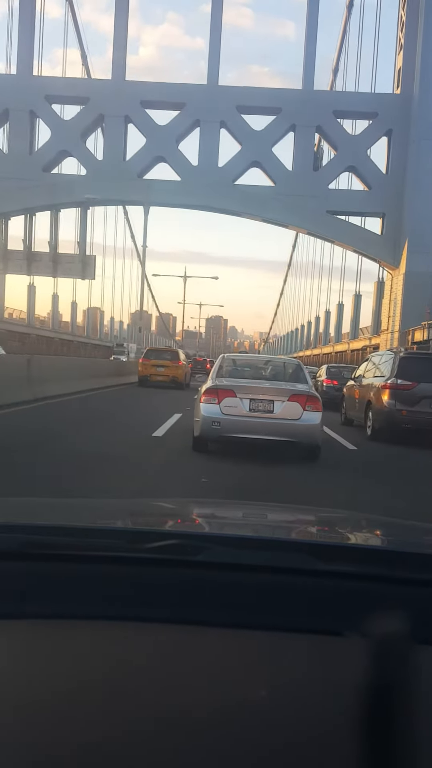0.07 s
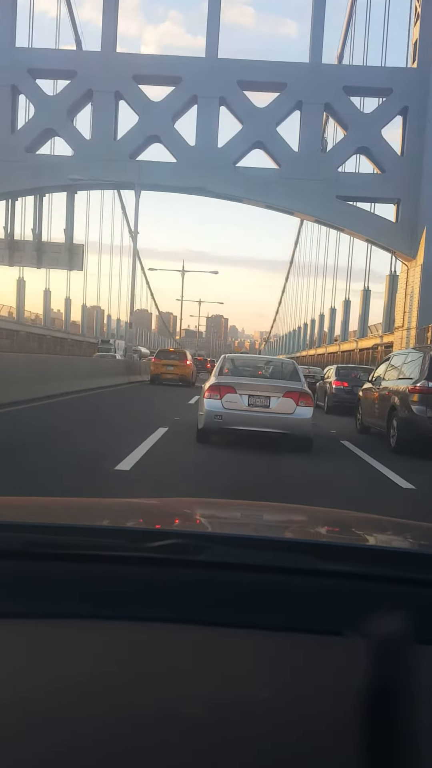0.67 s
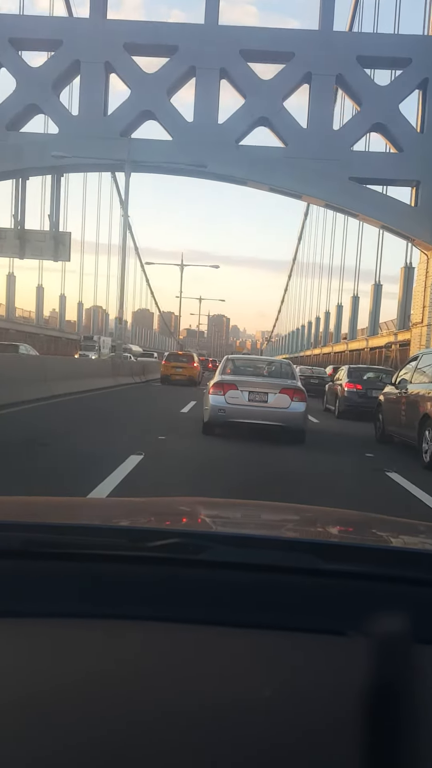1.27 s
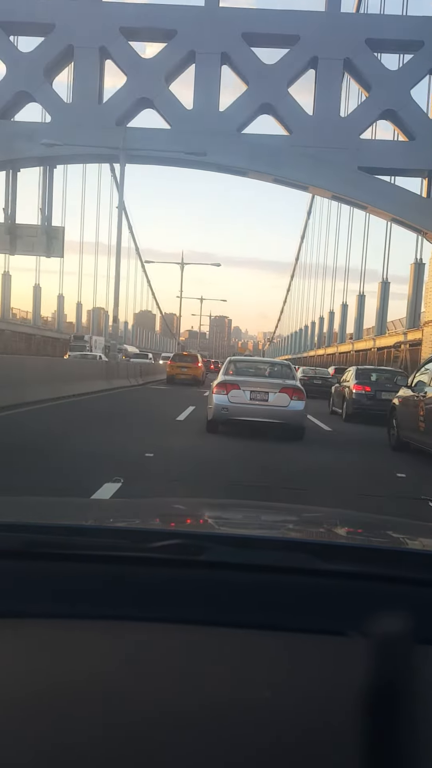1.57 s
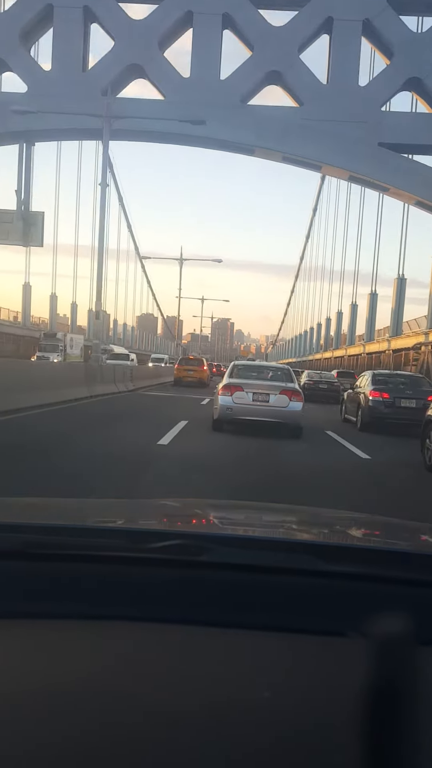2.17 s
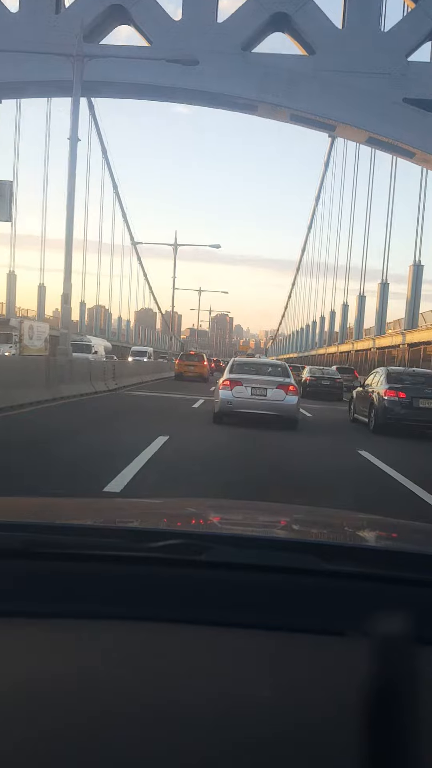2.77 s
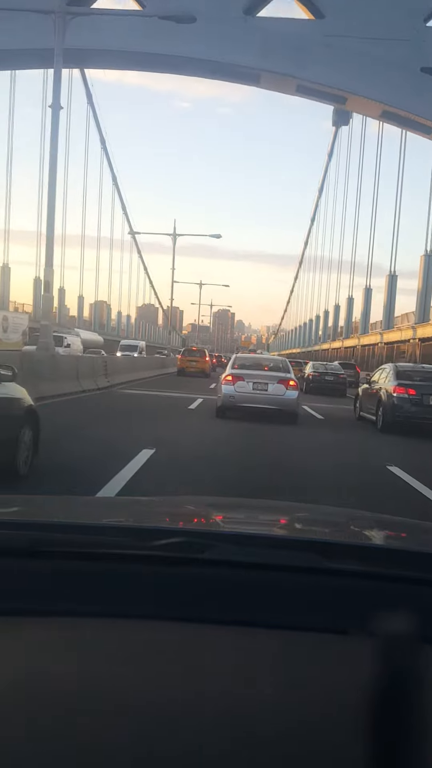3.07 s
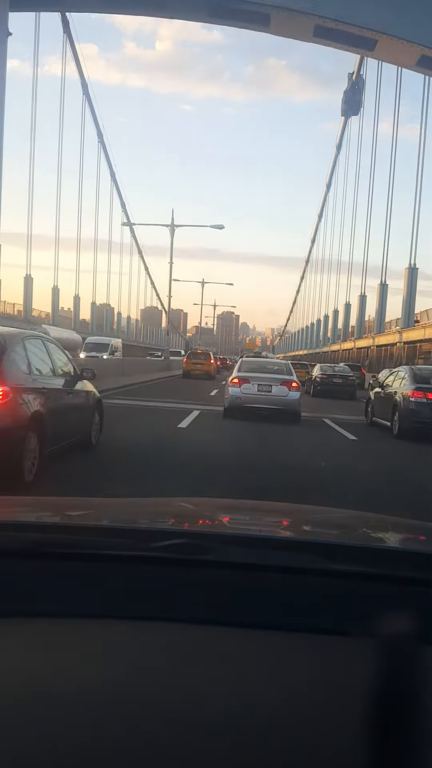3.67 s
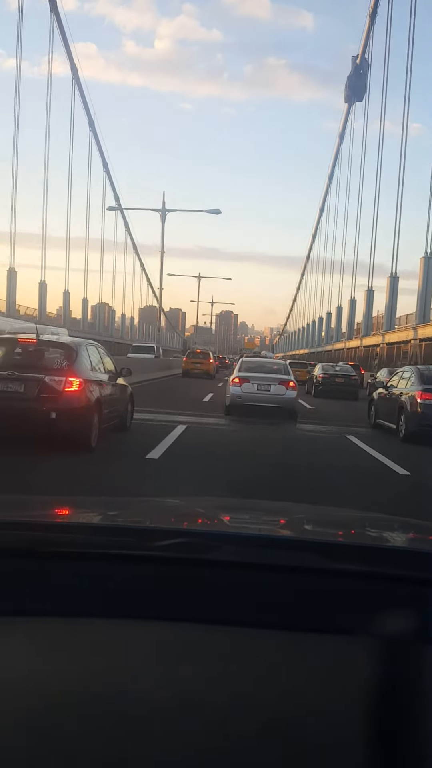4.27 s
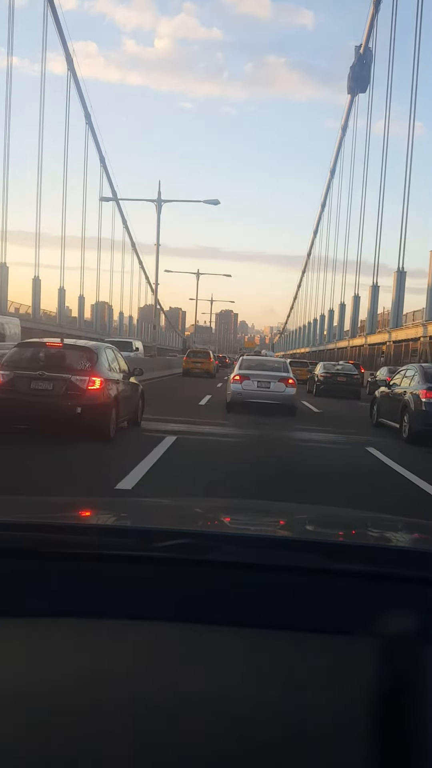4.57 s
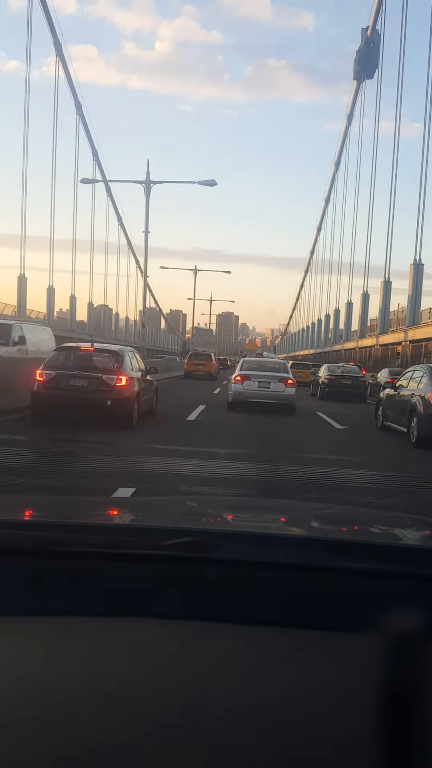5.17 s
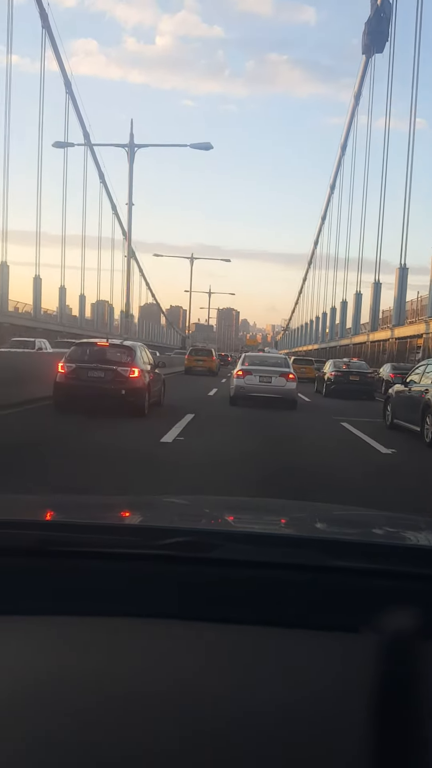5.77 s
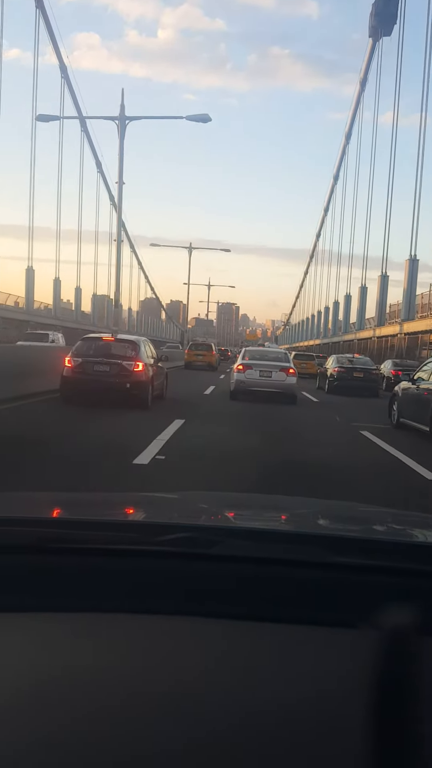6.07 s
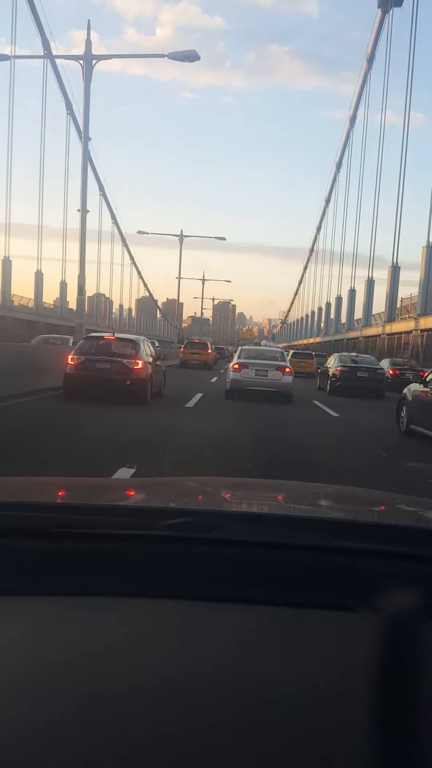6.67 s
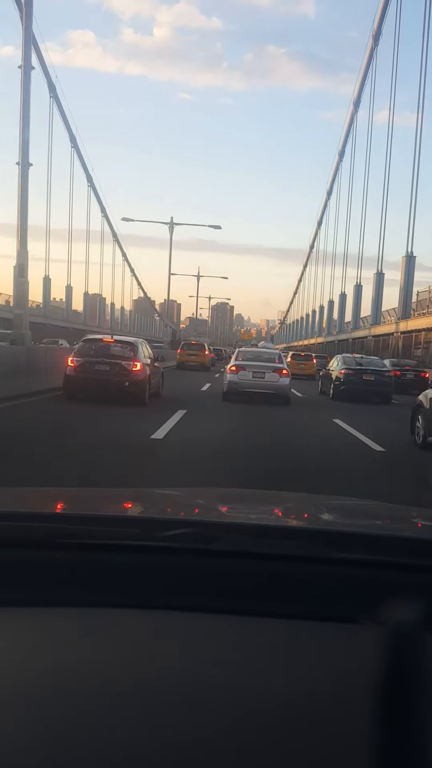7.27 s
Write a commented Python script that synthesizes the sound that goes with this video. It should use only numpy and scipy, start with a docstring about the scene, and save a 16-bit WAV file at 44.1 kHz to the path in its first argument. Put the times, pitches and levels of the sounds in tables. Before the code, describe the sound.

Low road rumble inside a moving car, with ticking plastic trim, one sharp clack and tyres thumping over a bridge joint.

```python
"""Road noise inside a car rolling over a suspension bridge in slow traffic.
The uneven deck drives the cabin's low resonances, the tyres roar, and nearby cars hiss and hum
through the glass. Front and rear wheels strike small seams, then rumble over a steel expansion joint.
Plastic trim ticks throughout, clacks once and creaks briefly by stick-slip friction.
Early on something soft brushes over the trim, and a tiny metal part chinks as it bounces."""
import sys
import numpy as np
from scipy import signal
from scipy.fft import rfft, irfft, next_fast_len
from scipy.io import wavfile
from scipy.ndimage import uniform_filter1d

SR = 44100
rng = np.random.default_rng(int(sys.argv[2]) if len(sys.argv) > 2 else 0)


def persist_wave(psi):
    """Save psi, clipped to +-1, as 16-bit WAV."""
    counts = np.round(np.clip(psi, -1, 1) * 32767).astype(np.int16)
    wavfile.write(sys.argv[1], SR, np.atleast_2d(counts).T)


N = 331191
TIME = np.arange(N) / SR


def gain_of(db):
    """Amplitude grows tenfold for every 20 dB."""
    return 10 ** (np.asarray(db) / 20)


def unit_rms(x):
    """Normalisation to a mean power of one."""
    return x / np.sqrt(np.mean(x ** 2) + 1e-20)


def at_hz(points, hz):
    """Interpolation on a logarithmic frequency axis."""
    f, value = np.transpose(points)
    return np.interp(np.log(hz + 1), np.log(f + 1), value)


def envelope(table, column):
    """Interpolation in decibels turns a column of levels into a gain for every sample."""
    rows = np.array(table)
    return gain_of(np.interp(TIME, rows[:, 0], rows[:, column]))


def add(mix, start_s, sound):
    """Superposition: a sound adds to the mix from its start time."""
    part = mix[:, round(start_s * SR):][:, :sound.shape[1]]
    part += sound[:, :part.shape[1]]


def noise():
    """Two uncorrelated white noises."""
    return rng.standard_normal((2, N))


def wander(fastest_hz):
    """Band-limited noise: a slow random motion of rms 1."""
    size = next_fast_len(N)
    hz = np.fft.rfftfreq(size, 1 / SR)
    spectrum = rfft(rng.standard_normal(size)) * (hz > 1) / (1 + (hz / fastest_hz) ** 4)
    return unit_rms(irfft(spectrum, size)[:N])


def ripple(hz, spacing_hz, depth_db):
    """Interference of reflections off glass and dashboard leaves fine peaks and dips above the bass."""
    heights = rng.standard_normal(2048)
    comb = np.interp(hz / spacing_hz, np.arange(len(heights)), heights)
    return depth_db * comb * np.clip(hz / 1200, 0, 1)


# Resonances of cabin air, tyre cavities and panels. Each row: frequency in Hz, width in Hz, lift in dB.
CABIN_MODES = [(115.4, 24, 5.5), (175.3, 24, 5.5), (201.8, 4.4, 6), (256, 19, 1.5), (643, 36, 5),
               (728, 50, 3), (970, 30, 0), (1096, 50, 4.5)]
# Likeness of left and right. Each row: frequency in Hz, correlation.
CORRELATION = [(40, 0.96), (200, 0.99), (280, 0.87), (470, 0.9), (570, 0.39), (660, 0.5), (880, 0.54),
               (1000, 0.36), (1100, 0.079), (1400, 0.17), (1750, -0.3), (2500, 0.57), (3400, -0.22),
               (5000, -0.013)]
# Stereo balance. Each row: frequency in Hz, left minus right in dB.
BALANCE = [(30, -4), (65, -0.5), (95, -1.5), (140, 0.5), (500, 0), (770, 2), (1200, 1), (3000, -1),
           (12000, -1)]


def in_cabin(drive, spectrum):
    """Forced response: noise excites the cabin's resonances, partly correlated between left and right."""
    size = next_fast_len(N)
    hz = np.fft.rfftfreq(size, 1 / SR)
    reflections = gain_of([ripple(hz, spacing_hz=45, depth_db=1.2) for _ in drive])
    common, apart = rfft(drive, size) * reflections
    correlation = at_hz(CORRELATION, hz)
    mid, side = common * np.sqrt(1 + correlation), apart * np.sqrt(1 - correlation)
    lean = gain_of(at_hz(BALANCE, hz) / 2)
    stereo = np.array([(mid + side) * lean, (mid - side) / lean])
    ring_db = sum(db / (1 + (2 * (hz - f) / width) ** 2) for f, width, db in CABIN_MODES)
    return unit_rms(irfft(stereo * gain_of(at_hz(spectrum, hz) + ring_db), size)[:, :N])


def steadied(x, span_s, share):
    """Sustained excitation: rolling keeps feeding a rumble, evening out a share of its slow swings."""
    span = int(span_s * SR)
    power = uniform_filter1d(uniform_filter1d((x ** 2).mean(0), span), span)
    return unit_rms(x / (np.abs(power) + 1e-9) ** (share / 2))


# Coarseness of the deck, greatest at the steel joint. Each row: time in seconds, coarseness in dB.
COARSENESS = [(0, 0), (.7, -1.5), (1.6, .5), (2.5, 1.5), (3.3, -1.5), (4.4, -1.5), (4.8, 3.5), (5.35, 4),
              (6.08, 6.5), (6.2, 8), (6.58, 9), (6.8, 4), (7.5, 4)]
# Humps, dips and seams. Each row: start in seconds, then peak shake, drum and roar, each in dB.
DECK_BUMPS = [(.13, -23, -27.5, -53), (1.02, -24, -50, -36), (1.36, -22.5, -33, -34.5),
              (2.57, -24, -29, -41), (2.77, -22.5, -27.5, -54), (3, -22, -26, -54),
              (4.14, -25.5, -43, -33.5), (4.54, -41, -28.5, -40), (5.26, -29, -27, -30),
              (5.65, -19.5, -33, -31.5), (5.99, -30, -20.5, -26), (6.135, -25, -24, -24.5),
              (6.48, -35, -20.5, -32), (6.7, -15, -24, -46), (6.869, -15, -37, -45),
              (7.19, -24, -26.5, -50)]


def deck_gain(asphalt_db, exponent, rise_s, bump_column):
    """Incoherent powers add: a power law of coarseness, plus a quick swell and slower fade per bump."""
    steady = gain_of(asphalt_db) * envelope(COARSENESS, column=1) ** exponent
    t = np.arange(SR) / SR
    swell = (t / rise_s * np.exp(1 - t / rise_s)) ** 0.6
    bump_power = np.zeros((1, N))
    for row in DECK_BUMPS:
        add(bump_power, row[0], (gain_of(row[bump_column]) * swell[None]) ** 2)
    return np.sqrt(steady ** 2 + bump_power)


# Spectra of body shake, panel drum and tread roar. Each row: frequency in Hz, relative density in dB.
SHAKE_SPECTRUM = [(12, -28.5), (24, -15), (33, -7.5), (41, 2), (53, 6.5), (64, -7), (76, 4.5), (92, -12.5),
                  (130, -31), (300, -90.5)]
DRUM_SPECTRUM = [(55, -48.5), (90, 0), (115, 1), (150, -4), (200, -8), (260, -10.5), (340, -19), (700, -67)]
ROAR_SPECTRUM = [(150, -2.5), (205, 3), (280, 3.5), (340, 2), (450, 1), (570, -2.5), (720, -11.5),
                 (900, -11), (1300, -32.5), (2500, -26.5), (6000, -63.5)]


def road():
    """Forced vibration: long road waves shake the body, shorter ones drum the panels, grit roars."""
    suspension_rise_s, tread_rise_s = 0.051, 0.02
    shake = steadied(in_cabin(noise(), SHAKE_SPECTRUM), span_s=.09, share=.85)
    shake *= deck_gain(asphalt_db=-25.5, exponent=0.72, rise_s=suspension_rise_s, bump_column=1)
    drum = steadied(in_cabin(noise(), DRUM_SPECTRUM), span_s=.06, share=.55)
    drum *= deck_gain(asphalt_db=-28, exponent=0.7, rise_s=suspension_rise_s, bump_column=2)
    grit = noise() * gain_of(0.56 * wander(fastest_hz=35))
    roar = steadied(in_cabin(grit, ROAR_SPECTRUM), span_s=.04, share=.4)
    roar *= deck_gain(asphalt_db=-37, exponent=1.2, rise_s=tread_rise_s, bump_column=3)
    return shake + drum + roar


# Tyres on worn surface. Each row: frequency in Hz, relative density in dB.
WORN_SPECTRUM = [(150, -28.5), (245, 8.5), (340, -7), (520, -6.5), (720, 1.5), (880, -1.5), (1100, -8.5),
                 (1600, -31), (4000, -63.5)]
# Worn deck before and after the joint. Each row: start in seconds, end in seconds, level in dB.
WORN_SPANS = [(5.144, 6.063, -33.5), (6.605, 7.8, -38)]


def worn_surface(fade_s=0.13):
    """Roughness excitation: a further roar fades in and out as the tyres cross each worn stretch."""
    roar = in_cabin(noise() * gain_of(1.4 * wander(fastest_hz=22)), WORN_SPECTRUM)
    return roar * sum(gain_of(db) * (np.tanh((TIME - start) / fade_s) - np.tanh((TIME - end) / fade_s))
                      for start, end, db in WORN_SPANS) / 2


# The surrounding cars. Each row: time in seconds, relative rush in dB, relative hiss in dB.
TRAFFIC_LEVELS = [(0, -43.5, -69.5), (1, -42, -74), (2.1, -43.5, -85), (3.5, -45.5, -73), (4.3, -45, -77),
                  (5.6, -41.5, -69), (6.1, -42, -70), (6.6, -41.5, -65), (7.5, -42.5, -69)]
# Spectra of their rush and hiss. Each row: frequency in Hz, relative density in dB.
RUSH_SPECTRUM = [(300, -2), (600, -7.5), (780, 1), (950, 0.5), (1020, -4.5), (1110, 0), (1350, -3.5),
                 (1650, -6), (2300, -13.5), (3200, -20), (3600, -23.5), (4700, -29), (8000, -39.5),
                 (16000, -52.5)]
HISS_SPECTRUM = [(1500, -13), (3000, 17), (4000, 13), (4700, 4), (6000, 1.5), (7800, 0), (8600, 2),
                 (10000, -1.5), (11000, -15), (13500, -11), (15800, -22)]


def traffic():
    """Airborne transmission: tyre rush comes through the glass, and a thin hiss leaks past the seals."""
    rush = in_cabin(noise(), RUSH_SPECTRUM) * envelope(TRAFFIC_LEVELS, column=1)
    rush *= gain_of(5 + 0.92 * wander(fastest_hz=25))
    hiss = in_cabin(noise(), HISS_SPECTRUM) * envelope(TRAFFIC_LEVELS, column=2)
    hiss *= gain_of(11.5 + 2.2 * wander(fastest_hz=24))
    return rush + hiss


# Hum of tread grooves. Each row: frequency in Hz, relative density in dB.
HUM_SPECTRUM = [(450, -33.5), (660, -6.5), (760, 6), (860, -9), (945, 6.5), (1020, -5), (1100, 0.5),
                (1250, -5), (1600, -28), (3000, -54)]


def passing_car(nearest_s=1.32, nearest_db=-39, passing_s=0.5, db_per_decade=24):
    """Attenuation with distance: the tread hum of a car in the next lane swells and fades as it passes."""
    distance = np.hypot(1, (TIME - nearest_s) / passing_s)  # in multiples of the closest distance
    return in_cabin(noise(), HUM_SPECTRUM) * gain_of(nearest_db - db_per_decade * np.log10(distance))


def plastic(impacts, spectrum, modes, rise_share, cabin_db, cabin_t60, right_db):
    """Impact on plastic: a crack of contact, a noisy snap, damped modes and brief cabin reverberation."""
    crack_db, crack_s = -8.5, 0.00017
    out, t = np.zeros((2, N)), np.arange(SR // 5) / SR
    hz = np.fft.rfftfreq(len(t), 1 / SR)
    spectrum_db = at_hz(spectrum, hz) + ripple(hz, spacing_hz=135.2, depth_db=2.5)
    centre_hz = np.mean([mode[0] for mode in modes])
    pan_db = np.array([[-right_db], [right_db]]) / 2
    for start_s, db, tilt_db, snap_s, ring_db in impacts:
        rise_s = rise_share * snap_s  # long snaps start softly
        attack = np.minimum(t / rise_s, 1)
        fade = np.exp(-np.maximum(t - rise_s, 0) / snap_s) + gain_of(cabin_db - 60 * t / cabin_t60)
        shape = gain_of(spectrum_db + tilt_db * np.log2(hz + 1))  # a softer blow has less treble
        burst = unit_rms(irfft(rfft(rng.standard_normal((2, len(t)))) * shape, len(t)))
        crack = burst * gain_of(crack_db) * np.exp(-((t - rise_s) / crack_s) ** 2)
        ring = sum(gain_of(ring_db + mode_db + tilt_db * np.log2(f / centre_hz) - 60 * t / t60)
                   * np.sin(2 * np.pi * (f * t + rng.random((2, 1)))) for f, mode_db, t60 in modes)
        add(out, start_s, (crack + (burst * fade + ring) * attack) * gain_of(db + pan_db))
    return out


# Ticks of the trim. Each row: start in seconds, level in dB, tilt in dB per octave,
# snap decay time in seconds, ring relative to the snap in dB.
TRIM_IMPACTS = [(.2704, -51, -3, .006, -10), (.444, -55, 8, .004, -4), (.523, -50, 6, .003, -3),
                (.611, -51, 5, .003, -8), (.7284, -54, 1, .002, -8), (.878, -43, -4.5, 0.0044, -10),
                (.9544, -46, -4, .004, -8), (1.2965, -44, -4, .005, -12), (1.639, -47.5, -3.5, .004, -8),
                (1.9815, -48, -3, 0.0071, -12), (2.2552, -40.5, -1.5, .008, 3),
                (2.3312, -30.5, 4, 0.0039, -2), (2.354, -46.5, 7, 0.0062, -7), (2.41, -56, 6, .006, -6),
                (2.459, -61, 8, .007, -6), (2.6025, -44, 7, .0045, -7), (2.6675, -49.5, -2, .007, -10),
                (2.888, -44, -5, .004, -9), (3.003, -41.5, -4.5, 0.0078, -14), (3.012, -46, -4, 0.011, -14),
                (3.3525, -46, -4, 0.0087, -15), (3.4163, -58, 4, .002, -8), (4.1655, -50.5, -2, 0.0024, -8),
                (4.4655, -51, 1, .0015, -12), (4.881, -44, -4, 0.0046, -18),
                (4.9165, -45.5, -2, 0.0033, -11), (5.2327, -51, -3, .003, -6), (5.48, -50, 0, .002, -8),
                (5.727, -50, 8, .0025, -8), (5.9945, -43.5, 6, 0.0051, -7), (6.1296, -43, 12, 0.0041, -7),
                (6.3095, -42.5, -5.5, .004, -14), (6.3357, -42, -4, 0.0036, -8),
                (6.488, -51, 0, 0.0028, -6), (6.6243, -41.5, -3, 0.002, -14)]
# Spectrum of a tick before its tilt. Each row: frequency in Hz, relative density in dB.
TRIM_SPECTRUM = [(1000, -9), (1800, 1), (2700, 9.5), (3300, 4.5), (4300, -0.5), (5300, -1), (7000, -2.5),
                 (9000, -0.5), (11800, -1.5), (13600, -5), (16000, -7)]
# Modes of the trim. Each row: frequency in Hz, relative level in dB, time to fall 60 dB in seconds.
TRIM_MODES = [(2700, -13, .03), (3600, -14, .025), (4200, -4.5, 0.055), (4370, -5, 0.039),
              (4900, -10, .025), (6325, -12, .035), (7900, -16, 0.035), (9300, -15, .04), (10700, -18, .05),
              (12000, -14, .025), (13650, -19.5, .055), (14050, -23, .05)]


def trim_ticks():
    """Impulse excitation: small snaps ring the high, quickly damped modes of the plastic trim."""
    return plastic(TRIM_IMPACTS, TRIM_SPECTRUM, TRIM_MODES,
                   rise_share=.25, cabin_db=-14, cabin_t60=.08, right_db=2.5)


# Swish of a soft stroke on the trim. Each row: frequency in Hz, relative density in dB.
SWISH_SPECTRUM = [(1500, -10), (2700, 1.5), (3150, 15.5), (3450, 6), (3950, 9.5), (4500, -8), (5100, 0.5),
                  (6500, -3.5), (8000, 0.5), (8550, 4), (10000, -4), (11000, -8.5), (13500, -5),
                  (15800, -17.5)]
# Resonances of its rasp. Each row: frequency in Hz, width in Hz, relative level in dB.
RASP_RESONANCES = [(3120, 220, 7), (3750, 180, -4), (4180, 260, -11)]


def brush(start_s=0.54, rise_s=0.3, swish_db=-55):
    """Sliding friction: a soft stroke swells and dies; while it drags, slips ring three resonances."""
    drag_from_s, drag_to_s, rasp_db, slips_per_s = .595, .9, -57, 260
    progress = np.maximum(TIME - start_s, 0) / rise_s
    swish = in_cabin(noise(), SWISH_SPECTRUM) * progress * np.exp(1 - progress)
    swish *= gain_of(swish_db + .7 * wander(fastest_hz=20))
    t = np.arange(SR // 50) / SR
    ring = sum(gain_of(db) * np.exp(-np.pi * width * t) * np.sin(2 * np.pi * hz * t)
               for hz, width, db in RASP_RESONANCES)
    slips = noise() * (rng.random(N) < slips_per_s / SR)
    rasp = unit_rms(signal.oaconvolve(slips, ring[None], axes=1)[:, :N])
    drag = uniform_filter1d(((TIME > drag_from_s) & (TIME < drag_to_s)) * 1., size=600)
    return swish + gain_of(rasp_db) * drag * rasp


# Bounces of a tiny metal part. Each row: start in seconds, level in dB.
METAL_BOUNCES = [(2.2552, -62), (2.3545, -61), (2.41, -62), (2.459, -67), (2.509, -67)]
# Its modes. Each row: frequency in Hz, relative level in dB, time to fall 60 dB in seconds.
METAL_MODES = [(8300, -4, .045), (9450, -6, .04), (10620, -2, .07), (10830, -5, .05), (12000, -6, .035),
               (13620, -5, .07), (13790, -3, .09), (14030, -6, .07)]


def metal_chinks():
    """Free vibration: each bounce rings the same high partials, which decay exponentially."""
    out, t = np.zeros((2, N)), np.arange(SR // 5) / SR
    for start_s, db in METAL_BOUNCES:
        for hz, mode_db, t60 in METAL_MODES:
            partial = np.sin(2 * np.pi * (hz * t + rng.random((2, 1))))
            add(out, start_s, gain_of(db + mode_db - 60 * t / t60) * partial)
    return out


# Blows on the tyres from seams and the joint, front axle then rear. Each row: start in seconds,
# relative level in dB, ring frequency in Hz, ring width in Hz, contact time in seconds.
TYRE_BLOWS = [(2.56, -25, 32.2, 14, 0.12), (3.0, -29, 31.8, 22, 0.091), (4.16, -39, 450, 240, 0.026),
              (4.595, -41, 646, 560, .05), (4.825, -38.5, 1030, 260, 0.03), (5.045, -37.5, 595, 330, 0.11),
              (5.159, -39, 1070, 180, .025), (5.2, -24, 31, 14, 0.078), (5.454, -29, 560, 78, 0.033),
              (5.756, -28.5, 477, 140, 0.061), (5.975, -21, 220, 120, 0.025), (6.003, -33, 950, 220, 0.015),
              (6.134, -19.5, 380, 490, 0.071), (6.175, -10.5, 110.5, 14.6, 0.062),
              (6.19, -26, 560, 150, 0.1), (6.2, -22.5, 215, 130, 0.071), (6.24, -11.5, 58, 20, 0.066),
              (6.27, -23, 200, 38, 0.082), (6.303, -32, 750, 460, 0.013), (6.31, -29, 402, 540, 0.23),
              (6.322, -28, 850, 110, 0.071), (6.346, -19.5, 220, 110, 0.059),
              (6.385, -21.5, 272, 130, 0.047), (6.399, -15, 30.7, 9.1, 0.18),
              (6.46, -20.5, 240, 100, 0.049), (6.466, -18, 50, 29, 0.077), (6.495, -18, 138, 39, 0.018),
              (6.5, -22, 202, 59, 0.14), (6.53, -23, 617, 51, 0.069), (6.556, -31, 453, 120, 0.042),
              (6.605, -21, 159, 73, 0.056), (6.684, -27, 850, 390, 0.007), (6.69, -33, 1050, 200, 0.032),
              (6.704, -26.5, 680, 45, 0.03), (6.712, -26, 230, 120, 0.028), (6.769, -26, 185, 53, 0.027),
              (6.83, -37, 742, 360, 0.0064), (7.151, -17, 31, 17, 0.09)]


def joint_blows(evenness=.8, side_per_hz=0.00066):
    """Damped resonance: each blow feeds one mode of wheel, body or steel while the contact lasts."""
    out, t = np.zeros((2, N)), np.arange(SR // 3) / SR
    f = np.fft.fftfreq(len(t), 1 / SR)
    for start_s, db, hz, width_hz, contact_s in TYRE_BLOWS:
        press = np.sin(np.pi * np.minimum(t / contact_s, 1))
        energy = signal.lfilter([1], [1, -np.exp(-2 * np.pi * width_hz / SR)], press ** 2)
        mode = (f > 0) / (1 + 2j * (f - hz) / width_hz)
        mode /= np.sqrt(1 + ((f - hz) / (hz / 2)) ** 4)  # steeper skirts
        ring = np.fft.ifft(np.fft.fft(rng.standard_normal((2, len(t)))) * mode)
        power = uniform_filter1d(abs(ring) ** 2, size=300, axis=1)
        # the rolling tyre keeps feeding the mode, so its swing hardly falters
        mid, apart = map(unit_rms, ring.real / power ** (evenness / 2) * np.sqrt(energy))
        side = apart * side_per_hz * hz  # shorter waves differ more between left and right
        add(out, start_s, gain_of(db) * np.sqrt(contact_s / t[-1]) * np.array([mid + side, mid - side]))
    return gain_of(-3.5) * out


# Knocks of a loose plastic part. Each row: start in seconds, level in dB, tilt in dB per octave,
# snap decay time in seconds, ring relative to the snap in dB.
PART_IMPACTS = [(3.5405, -45, 1, 0.0032, -8), (3.5528, -26, 1, 0.0044, -7),
                (3.5575, -21.5, -0.5, 0.0052, -6), (3.563, -26, 0.5, 0.0037, -9),
                (3.5705, -27, 0, 0.01, -2), (3.583, -35, -3, 0.0044, -7)]
# Spectrum of a knock before its tilt. Each row: frequency in Hz, relative density in dB.
PART_SPECTRUM = [(150, 0), (320, 8), (450, 9), (600, 20), (700, 9), (800, -7), (950, 6), (1300, -1),
                 (1600, -4), (2200, -1), (3000, -3), (4000, -8), (5300, -7), (7500, -17), (9300, -11),
                 (12000, -17.5), (16000, -31)]
# Modes of the part. Each row: frequency in Hz, relative level in dB, time to fall 60 dB in seconds.
PART_MODES = [(319, 1.5, 0.1), (440, -6, .07), (530, -2, 0.07), (638, 3, 0.087), (700, -6, .05),
              (950, -3, 0.032), (1305, -3.5, 0.081), (1780, -15, .04), (2070, -12, 0.044),
              (3220, -6.5, .035), (4270, -12, .035), (9450, -18, .025)]


def loose_part_clack():
    """Temporal fusion: a loose part slides, knocks and settles so fast that one clack is heard."""
    return plastic(PART_IMPACTS, PART_SPECTRUM, PART_MODES,
                   rise_share=.22, cabin_db=-15, cabin_t60=.09, right_db=1.5)


# Creaks of rubbing trim. Each row: start in seconds, level in dB, pitch in Hz, length in seconds,
# unsteadiness as a share of the pitch.
CREAKS = [(4.624, -44, 2640, 0.014, 0.088), (4.858, -48.5, 2540, .03, 0.147)]


def trim_creaks():
    """Stick-slip friction: the trim sounds a brief, unsteady, slightly rising tone."""
    out = np.zeros((2, N))
    for start_s, db, hz, length_s, unsteadiness in CREAKS:
        progress = np.linspace(0, 1, int(length_s * SR))
        jitter = unit_rms(uniform_filter1d(rng.standard_normal((2, SR // 5)), size=40))
        pitch_hz = hz * (1 + unsteadiness * (progress - .5 + jitter[:, :len(progress)]))
        tone = np.sin(2 * np.pi * np.cumsum(pitch_hz, axis=1) / SR)
        add(out, start_s, gain_of(db) * unit_rms(tone * np.sin(np.pi * progress)))
    return out


def scene():
    """Superposition of road, traffic and joint outside with loose trim and small noises inside."""
    outside = road() + worn_surface() + traffic() + passing_car() + joint_blows()
    inside = loose_part_clack() + trim_ticks() + trim_creaks() + metal_chinks() + brush()
    return outside + inside


def record(dry):
    """Band limiting: a steep low-pass filter removes the highest treble."""
    cutoff_hz = 15800
    low_pass = signal.firwin(511, cutoff_hz, window=("kaiser", 9), fs=SR)
    return signal.oaconvolve(dry, low_pass[None], "same")


dry = scene()
out = record(dry)
persist_wave(out)
```